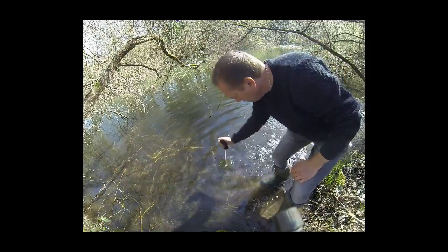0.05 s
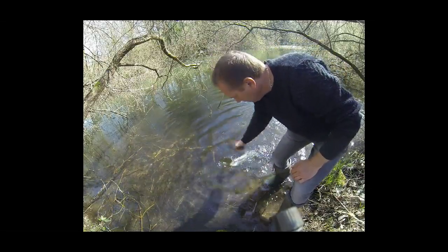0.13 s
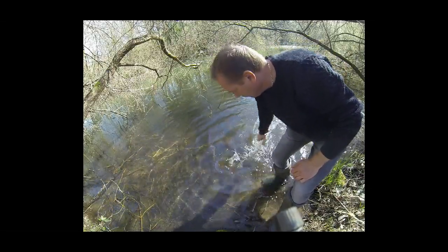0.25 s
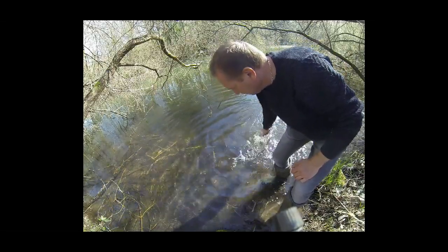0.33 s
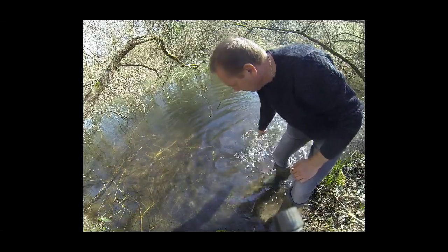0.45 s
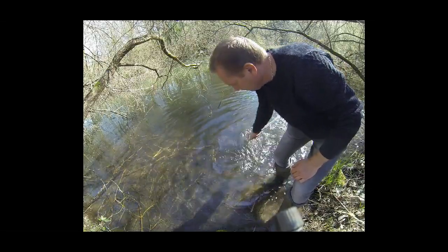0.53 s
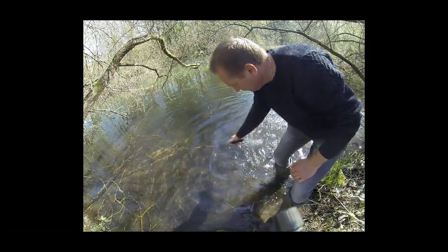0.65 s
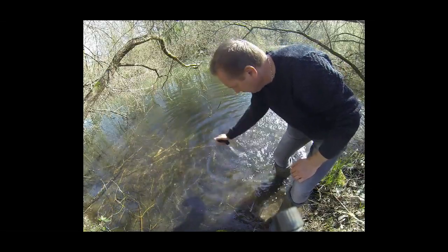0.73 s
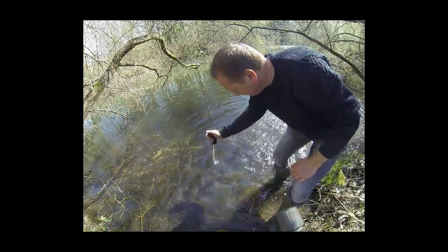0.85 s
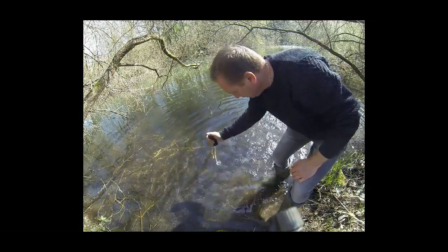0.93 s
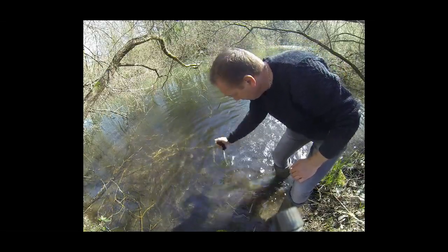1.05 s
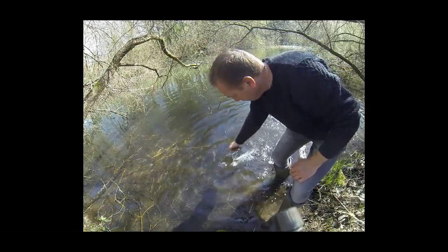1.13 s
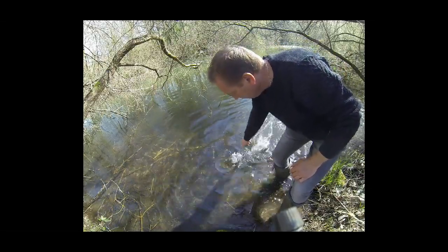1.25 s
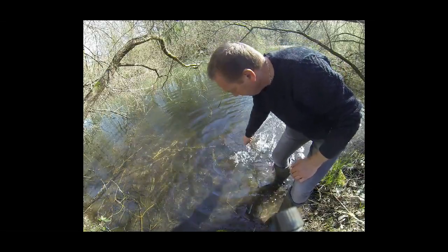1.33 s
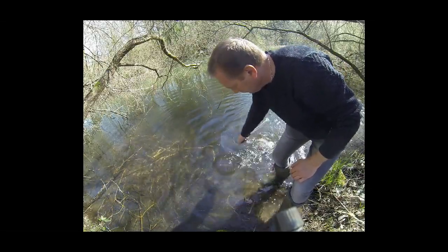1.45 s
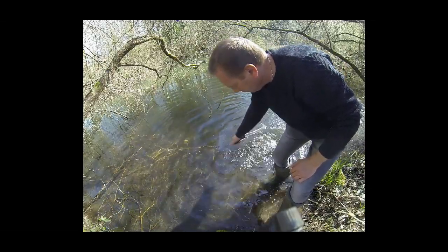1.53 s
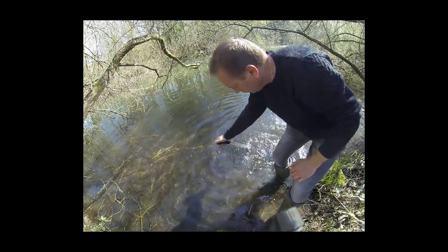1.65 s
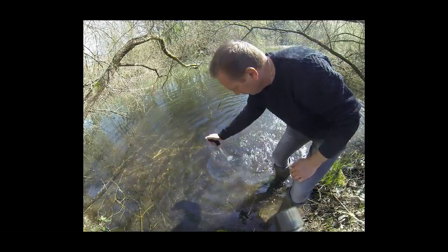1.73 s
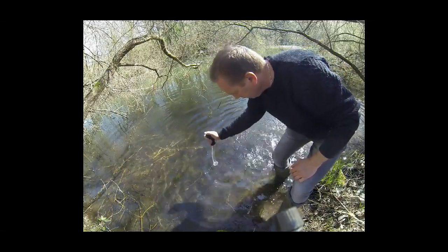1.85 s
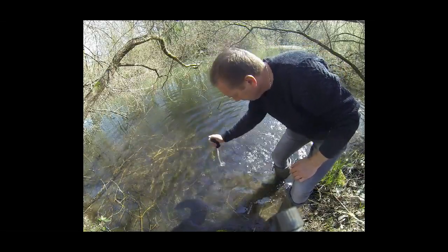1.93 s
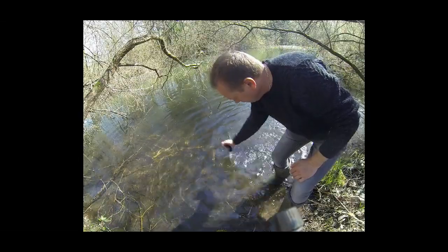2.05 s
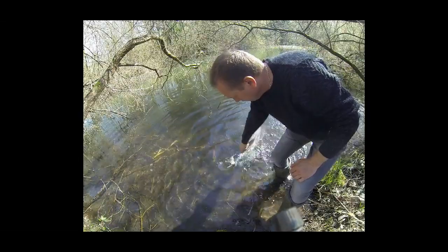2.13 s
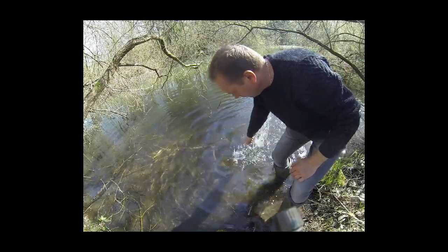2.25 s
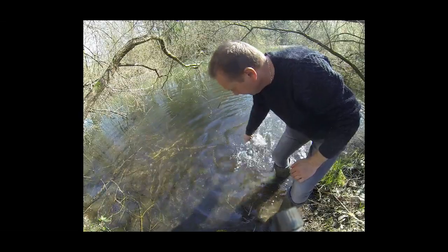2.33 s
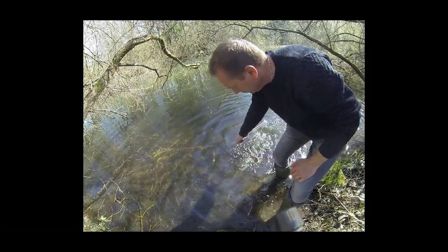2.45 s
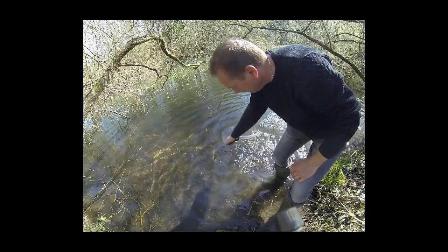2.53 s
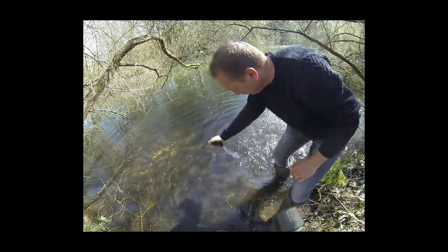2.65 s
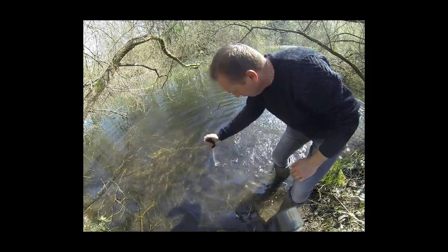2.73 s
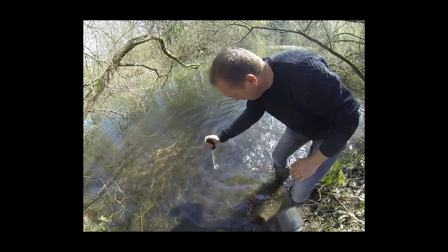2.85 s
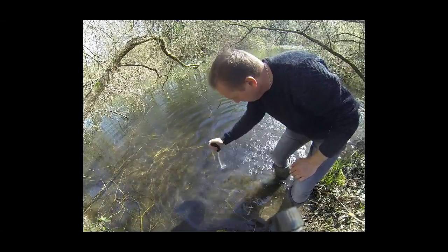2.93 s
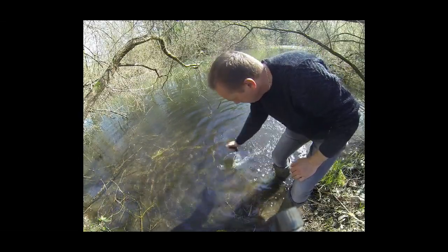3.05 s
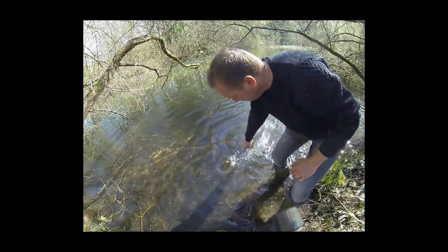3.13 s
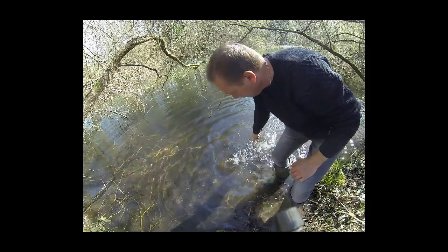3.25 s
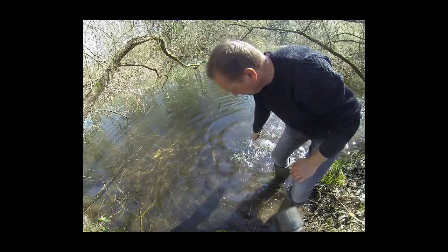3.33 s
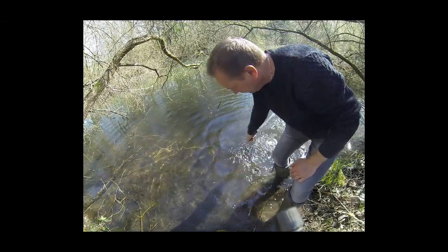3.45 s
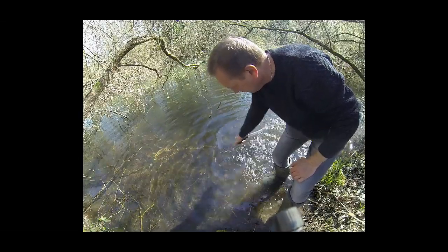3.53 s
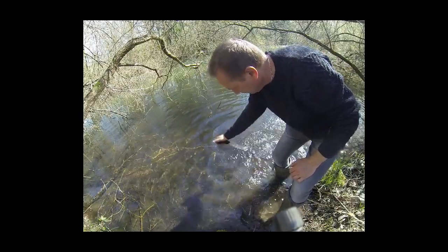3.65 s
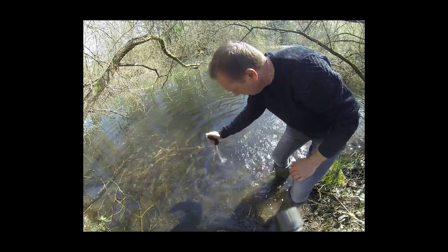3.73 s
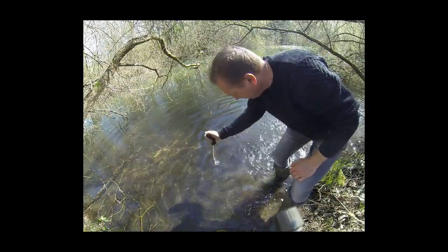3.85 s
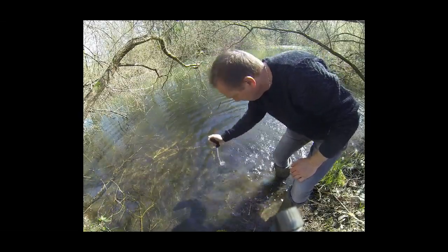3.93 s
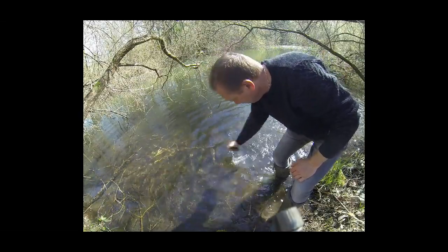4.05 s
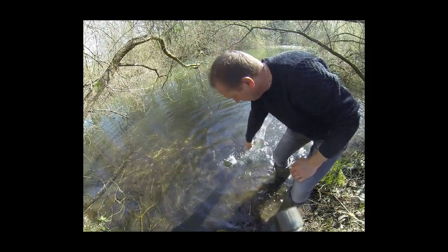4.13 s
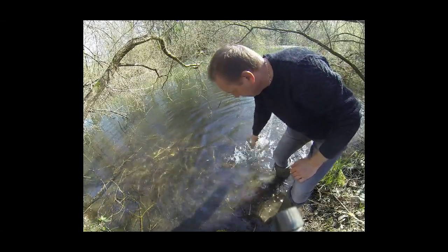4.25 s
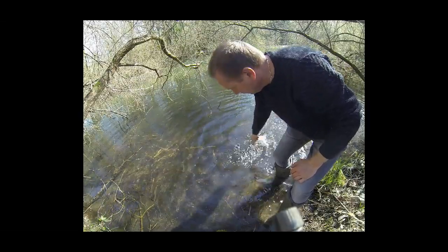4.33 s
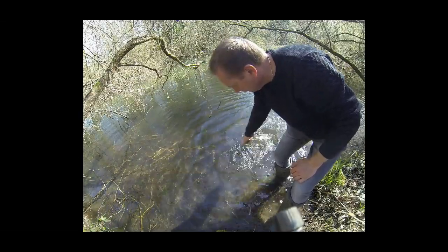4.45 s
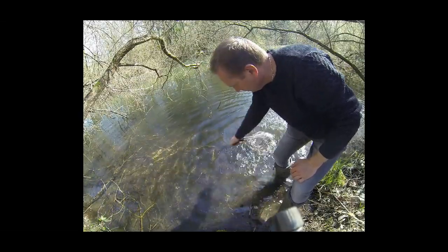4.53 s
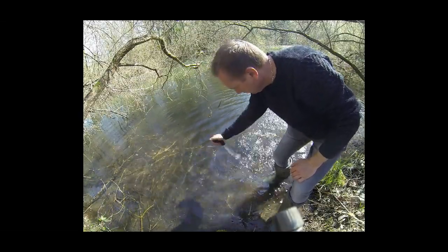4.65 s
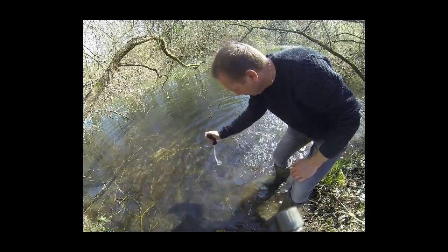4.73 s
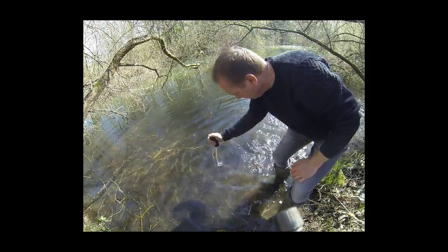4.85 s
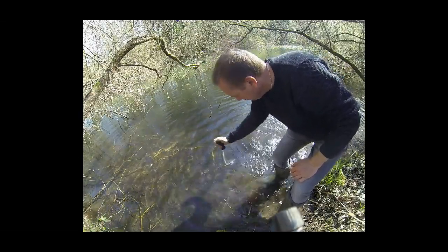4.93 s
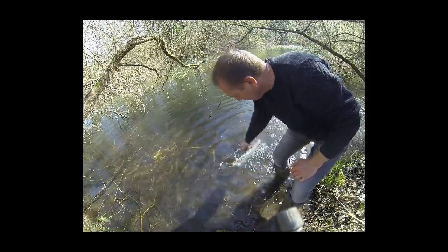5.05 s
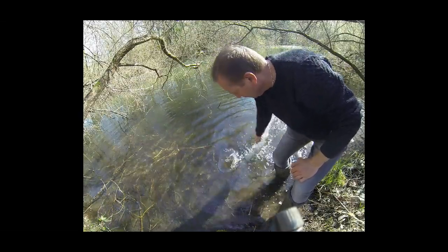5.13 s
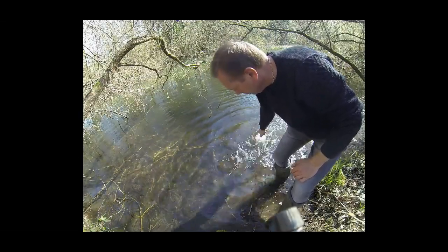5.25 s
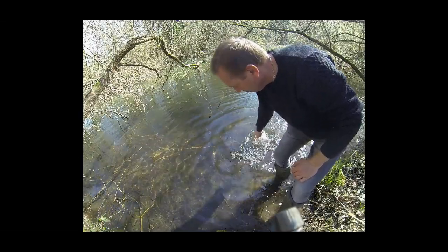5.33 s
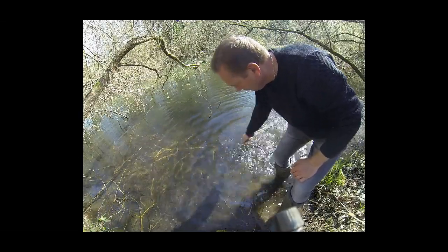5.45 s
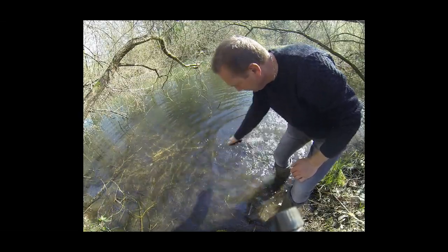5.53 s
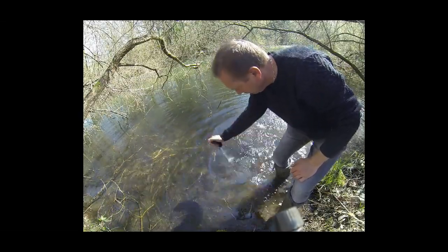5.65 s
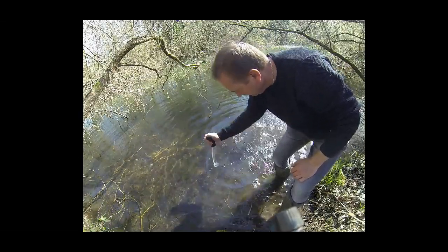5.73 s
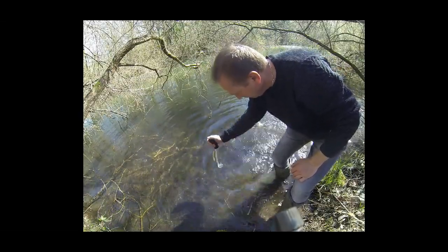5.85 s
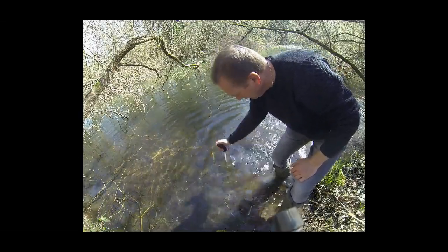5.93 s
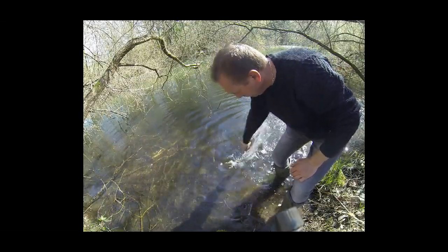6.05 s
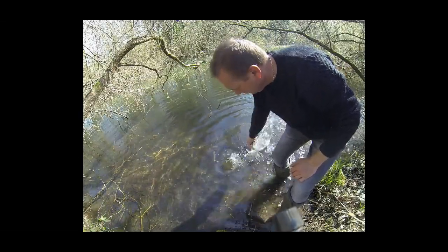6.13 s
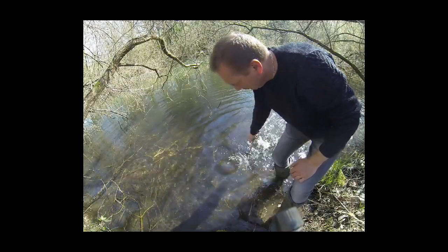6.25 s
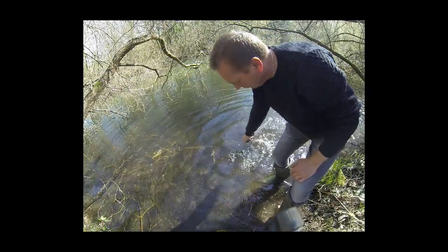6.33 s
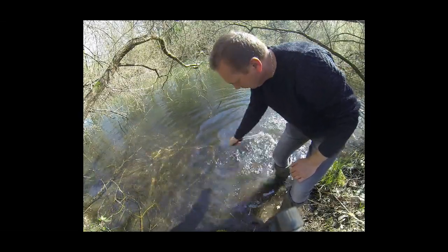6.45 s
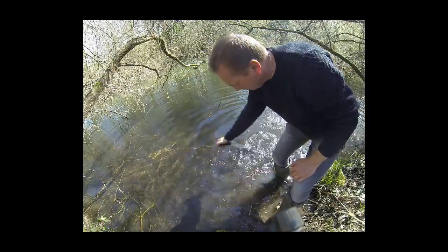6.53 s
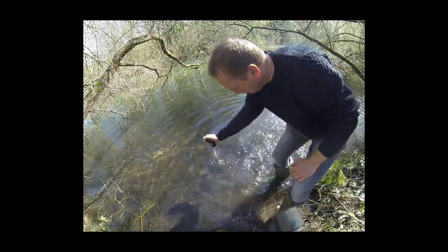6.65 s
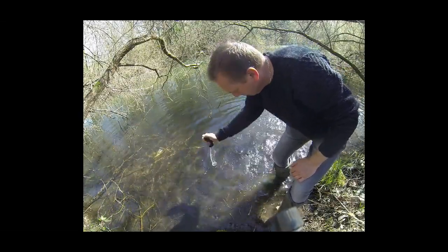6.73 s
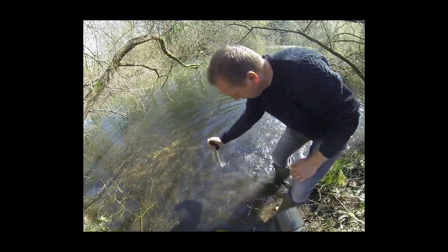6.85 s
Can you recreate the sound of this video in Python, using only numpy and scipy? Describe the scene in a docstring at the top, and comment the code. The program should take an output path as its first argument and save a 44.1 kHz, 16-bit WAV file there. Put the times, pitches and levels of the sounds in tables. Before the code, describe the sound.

Steady rhythm of seven deep water gulps at a tree-lined bank, close microphone. Each begins with a soft wet slap and low throb, pinches off and rises in a short round 'gloop', then water falls back with chirping bubbles, fine spray and a few bright drips. Between strokes it is quiet: a low airy hush, distant whistles and twitters, only a slight echo from the bank.

```python
"""A shallow bank with trees: a man drives a wooden catfish clonk into the water about once a second.
Each stroke is a gliding tone: an air cavity throbs, pinches off and rings as one big rising bubble.
Shaped noise makes the slaps and drips; dying sines make the small bubbles; swarms of both make the slosh.
Gliding sines and a band of noise make birds far off in the trees, over a soft outdoor hush."""
import sys
import numpy as np
from scipy import signal
from scipy.fft import rfft, irfft
from scipy.io import wavfile

SR = 44100
rng = np.random.default_rng(int(sys.argv[2]) if len(sys.argv) > 2 else 0)


def file_out(sig):
    """Save sig as 16-bit WAV at sys.argv[1]."""
    # one column per channel
    cols = np.atleast_2d(sig).T
    # limit, then scale
    lim = np.clip(cols, -1, 1)
    pcm = np.round(lim * 32767).astype(np.int16)
    wavfile.write(sys.argv[1], SR, pcm)


N = 303849
TIME = np.arange(N) / SR

# Levels in the tables are relative: the layers that use them may trim them further.
# Spectrum of the outdoor hush: pitch_hz [Hz], level_db [dB]
AIR_SPECTRUM = [(10, -6), (22, 2.5), (55, 0), (170, -13.5), (320, -18.5), (560, -20), (1000, -24.5),
                (2600, -32.5), (3600, -31), (4600, -32.5), (5500, -33), (9000, -44), (11000, -41),
                (12800, -54.5)]
AIR_DB = -50.5
# Level curve of a far bird's buzzing trill: start_s [s], level_db [dB]
TRILL_CURVE = [(.5, -65), (.65, -63.5), (1.0, -65.5), (1.15, -77)]
# Long whistles of distant birds: start_s [s], length_s [s], start_hz [Hz], end_hz [Hz], level_db [dB]
BIRD_WHISTLES = [(0.47, 0.28, 1854, 1893, -63.5), (0.81, 0.197, 2135, 2236, -59.5),
                 (1.44, 0.146, 2350, 2230, -67), (4.55, 0.23, 6000, 5460, -68)]
# One bird's swooping note: start_s [s], length_s [s], lowest_hz [Hz], level_db [dB],
# hook [rise at the end, share of the pitch]
BIRD_SWOOPS = [(3.65, .06, 3500, -59, 0.08), (5.34, 0.056, 4700, -57, 0.044),
               (5.39, 0.055, 3900, -54.5, 0.032), (5.701, .07, 4780, -59, 0.024),
               (5.82, .1, 3770, -58, .14), (6.10, .07, 4900, -57, 0), (6.487, .11, 3700, -59.5, 0.13),
               (6.83, .07, 4850, -56, 0.038)]
SWOOP_DROP, SWOOP_FALL_S = 0.42, 0.012  # extra pitch at the start as a share, and how fast it falls away
HOOK_AT_S, HOOK_RISE_S = 0.062, 0.01
# Runs of very high, thin calls: start_s [s], length_s [s], level_db [dB]
BIRD_TWITTERS = [(1.54, .2, -71), (4.488, .45, -74), (5.463, .4, -72)]
# Spectrum of the echo off bank and trees: pitch_hz [Hz], level_db [dB]
BANK_SPECTRUM = [(60, -24), (160, -12), (260, -2), (430, 0), (650, -6), (2000, -8), (12000, -15)]
# Spectra of coarse churn and fine spray: pitch_hz [Hz], level_db [dB]
CHURN_SPECTRUM = [(180, -7), (330, -19), (600, -2), (1100, 1.5), (2000, -1), (3000, -1.5), (4300, -7),
                  (5500, -20), (7000, -28)]
SPRAY_SPECTRUM = [(3000, 6), (5000, 2), (6200, 3.5), (7600, -5), (10000, -4), (12000, -12.5), (15000, -52)]
# Thrown water falls back about a fifth of a second after each stroke:
# start_s [s], length_s [s], level_db [dB]
WATER_FALLBACKS = [(0.243, .16, -50), (1.316, 0.059, -44.5), (2.299, 0.076, -45), (3.237, 0.055, -44),
                   (4.255, .12, -45.5), (5.215, 0.12, -43), (6.214, 0.11, -44.5)]
FALLBACK_RISE_S, FALLBACK_DECAY_S = 0.023, 0.065  # of the amplitude swell
SPLASH_DECAY_S = 0.012
# Drips off the lifted blade: start_s [s], level_db [dB], pitch_hz [Hz], width_hz [Hz]
BLADE_DRIPS = [(.335, -43.5, 5300, 3000), (0.549, -46.5, 4900, 2520), (1.307, -51, 6900, 3000),
               (1.785, -52, 6700, 450), (2.373, -45.5, 6360, 500), (2.648, -50, 5760, 600),
               (2.8414, -55, 7060, 450), (4.4816, -47, 6360, 800), (5.500, -50.5, 5500, 2530),
               (5.947, -37, 7460, 4070)]
DRIP_T60_S = 0.05
# A bright tick at the top of each swing: start_s [s], level_db [dB]
SWING_TICKS = [(.9756, -52), (1.933, -48.5), (2.900, -46.5), (3.9176, -45), (4.877, -44.5), (5.8538, -47),
               (6.828, -47.5)]
# The blade tip breaks the surface just before each stroke: start_s [s], level_db [dB], start_hz [Hz]
TIP_ENTRIES = [(.057, -36, 720), (1.060, -28.5, 614), (2.021, -29.5, 546), (2.996, -38.5, 740),
               (3.993, -29.5, 630), (4.958, -30.5, 690), (5.935, -27, 593)]
# The largest bubbles in the wake: start_s [s], start_hz [Hz], level_db [dB],
# rise [share of the pitch over the ring], pop [strength as a share of the ring]
WAKE_BUBBLES = [(0.2, 1045, -28.5, 0.6, .1), (0.286, 1610, -31.5, 0, 0.94), (.347, 1750, -37, .1, 0.27),
                (0.381, 1200, -35, 0.43, .1), (0.414, 1720, -37, 0.099, .1), (1.323, 2830, -28, 0.1, 0.44),
                (1.328, 1060, -39, 0.2, .1), (1.351, 867, -36, 0.061, 0.09), (1.424, 1160, -43, 0.2, .1),
                (2.07, 720, -25.5, 0.12, 0.091), (2.159, 980, -29, 1, 0.43),
                (2.358, 1046, -34.5, 0.67, 0.089), (3.051, 1090, -23.5, 0.029, .1),
                (3.122, 1080, -33, 0.036, .1), (3.275, 4030, -31.5, 0.81, .1), (3.295, 1480, -37, .1, 0.58),
                (3.346, 866, -32, 1, .2), (3.436, 1170, -42, .1, .1), (4.162, 1355, -30.5, 0.07, 0.69),
                (4.296, 1360, -31.5, 0.017, 0.17), (4.388, 1207, -33, 0, .1), (4.427, 2370, -36.5, .1, .1),
                (5.031, 1080, -32.5, 0.1, .1), (5.214, 602, -31.5, 0.063, 0.18),
                (5.24, 745, -31, 0.042, .1), (5.271, 2160, -28, 0.49, .1), (5.303, 1065, -31, 0.43, 0.55),
                (5.416, 990, -46, 0.12, .7), (6.191, 805, -33, 0.23, 0.94), (6.231, 824, -23.5, 0.48, 0.27),
                (6.289, 993, -32.5, 0.08, .1)]
RING_T60_S, RING_AT_HZ, RING_SLOPE = 0.051, 990, 0.72  # smaller bubbles ring higher and die sooner
# Spectrum of slaps, smacks and bubble pops: pitch_hz [Hz], level_db [dB]
SLAP_SPECTRUM = [(150, 6), (450, 0.5), (850, -1), (1300, -7), (2000, -6), (2800, -14), (4200, -13.5),
                 (6300, -27.5), (8500, -22), (11500, -35), (15000, -58)]
# The strokes: start_s [s], cavity_db [dB], settled cavity_hz [Hz], pinch_s [s after the start],
# bubble_db [dB], bubble start_hz [Hz], bubble life_s [s], slap_db [dB], smack_lead_s [s],
# smack_db [dB], splash_db at pinch-off [dB], churn_db [dB], churn_life_s [s]
CLONK_STROKES = [(0.0878, -7, 77.4, 0.032, -6, 250, 0.02, -21, 0.0027, -22, -38, -44, .11),
                 (1.0959, -6, 64.6, 0.0079, -5.5, 171, 0.042, -20, 0.0032, -23, -37, -48.5, 0.25),
                 (2.054, -5, 74, 0.014, -8.5, 164, 0.035, -20.5, .003, -14.5, -34.5, -47.5, 0.26),
                 (3.0290, -6.5, 80.4, 0.02, -6.5, 230, 0.025, -17.5, .003, -28, -36, -47, 0.15),
                 (4.0323, -8, 59, 0.0103, -6.5, 121.5, 0.0444, -19, 0.0027, -41, -32.5, -46.5, 0.23),
                 (4.9983, -5, 68.5, 0.013, -9, 146, 0.037, -17.5, 0.014, -21.5, -35.5, -48.5, 0.31),
                 (5.9722, -3.5, 80, 0.0056, -7, 135, 0.045, -19, 0.0021, -14, -57, -49, 0.37)]
STROKE_LEAD_S = 0.02  # sound rendered ahead of each plunge
EDGE_HZ = 15500


def amp(db):
    """Decibels to gain."""
    return 10 ** (np.asarray(db) / 20)


def unit(x):
    """Scales to an rms of one."""
    return x / np.sqrt(np.mean(x ** 2) + 1e-20)


def add(mix, start_s, sound):
    """Mixes a sound in at start_s, cut off at the end of the mix."""
    part = mix[max(round(start_s * SR), 0):][:len(sound)]
    part += sound[:len(part)]


def colour(x, points):
    """Gives x a spectrum of (Hz, dB) points, at an rms of one."""
    hz, db = np.transpose(points)
    f = np.fft.rfftfreq(len(x), 1 / SR)
    gain = amp(np.interp(np.log(f + 1), np.log(hz), db))
    return unit(irfft(rfft(x) * gain, len(x)))


def band(hz, width_hz, size=N):
    """Noise in a bell-shaped band; around zero it is a slow random drift."""
    f = np.fft.rfftfreq(size, 1 / SR)
    bell = np.exp(-0.5 * ((f - hz) / width_hz) ** 2)
    return unit(irfft(rfft(rng.standard_normal(size)) * bell, size))


def sine(hz):
    """A sine that follows the pitch curve hz."""
    return np.sin(2 * np.pi * np.cumsum(hz) / SR)


def air(gust_db=2, whine_hz=5080, whine_width_hz=65, whine_db=-73, octave_db=-87):
    """Outdoor hush with an uneven rumble, and a faint thin whine with its octave."""
    hush = amp(AIR_DB) * colour(rng.standard_normal(N), AIR_SPECTRUM)
    rumble = signal.sosfilt(signal.butter(2, 120, fs=SR, output="sos"), hush)
    unevenness = amp(gust_db * band(0, 1.3)) - 1
    whine = amp(whine_db) * band(whine_hz, whine_width_hz)
    octave = amp(octave_db) * band(2 * whine_hz, 2 * whine_width_hz)
    return hush + rumble * unevenness + whine + octave


def chatter(lo_hz=4600, hi_hz=8600, chatter_db=-80, fall=0.081, waver=0.023, count=200):
    """Many small birds farther off: short quavering, falling chips at random."""
    out = np.zeros(N)
    quaver = waver * band(0, 117)
    for when, pitch, span, loud in rng.random((count, 4)):
        u = np.linspace(0, 1, int((0.024 + 0.095 * span) * SR))
        wobble = quaver[int(when * (N - len(u))):][:len(u)]
        hz = (lo_hz + (hi_hz - lo_hz) * pitch) * (1 - fall * u + wobble)
        add(out, when * N / SR, amp(chatter_db + 5.7 * loud) * np.sin(np.pi * u) * sine(hz))
    return out


def note(hz, waver=0.0178):
    """A soft-edged bird note that wavers around the pitch curve hz."""
    hz = hz * (1 + waver * band(0, 42, size=SR)[:len(hz)])
    return np.sqrt(2) * signal.windows.tukey(len(hz), 0.6) * sine(hz)


def trill(hz=3500, width_hz=560):
    """A buzzing trill: a band of noise that follows a level curve, silent outside it."""
    level_db = np.interp(TIME, *np.transpose(TRILL_CURVE), left=-np.inf, right=-np.inf)
    return amp(level_db) * band(hz, width_hz)


def whistles():
    """Thin whistles that glide quickly at first, then settle on the end pitch."""
    out = np.zeros(N)
    for start_s, length_s, start_hz, end_hz, level_db in BIRD_WHISTLES:
        u = np.linspace(0, 1, int(length_s * SR))
        hz = end_hz + (start_hz - end_hz) * (1 - u) ** 2
        add(out, start_s, amp(level_db) * note(hz, waver=0.0113))
    return out


def swoops():
    """Notes that swoop down in pitch and may hook up again."""
    out = np.zeros(N)
    for start_s, length_s, lowest_hz, level_db, hook in BIRD_SWOOPS:
        t = np.arange(0, length_s, 1 / SR)
        hooked = 0.5 + 0.5 * np.tanh((t - HOOK_AT_S) / HOOK_RISE_S)
        hz = lowest_hz * (1 + SWOOP_DROP * np.exp(-t / SWOOP_FALL_S) + hook * hooked)
        add(out, start_s, amp(level_db) * note(hz))
    return out


def twitters(start_hz=8400, fall=0.11, call_s=0.07, gap_s=0.14, scatter=0.02):
    """Evenly spaced falling calls, each at a slightly different pitch."""
    out = np.zeros(N)
    slide = start_hz * np.linspace(1, 1 - fall, int(call_s * SR))
    for start_s, length_s, level_db in BIRD_TWITTERS:
        for when in np.arange(start_s, start_s + length_s, gap_s):
            add(out, when, amp(level_db) * note(slide * (1 + scatter * rng.standard_normal())))
    return out


def echo(x, t60_s, points, delay_s=0.011):
    """Scattered reflections from the bank and the trees: sparse random taps that swell, then die."""
    t = np.arange(SR) / SR
    sparse = rng.standard_normal(SR) * (rng.random(SR) < 0.05)
    taps = colour(sparse, points) * amp(-60 * t / t60_s) * (1 - np.exp(-(t / delay_s) ** 2))
    return signal.oaconvolve(x, taps / np.linalg.norm(taps))[:N]


def plip(hz, t60_s, glide, attack_s=0.0003):
    """A small bubble: a dying sine whose pitch slides by the share glide over its ring."""
    t = np.arange(int(t60_s * SR) + 2) / SR
    ring = sine(hz * (1 + glide * t / t60_s))
    return ring * amp(-60 * t / t60_s) * (1 - np.exp(-t / attack_s))


def droplets(lo_hz, hi_hz, per_s, spread_db, cycles, count=28):
    """A dense swarm of tiny bubbles, most weak and a few strong; all ring for as many cycles."""
    out = np.zeros(N)
    for hz in np.geomspace(lo_hz, hi_hz, count):
        strength = amp(spread_db * np.minimum(rng.exponential(1, N), 3.5))
        hits = (rng.random(N) < per_s / count / SR) * strength
        drop = hz * plip(hz, cycles / hz, 0.055, attack_s=1.06 / hz)
        out += signal.oaconvolve(hits, drop)[:N]
    return unit(out)


def agitation(splash_gain_db, churn_gain_db, fallback_gain_db):
    """How hard the water moves: splash at pinch-off, churn that holds and stops, water falling back."""
    power, t = np.zeros(N), np.arange(SR) / SR
    for start_s, _, _, pinch_s, *_, splash_db, churn_db, churn_life_s in CLONK_STROKES:
        splash = amp(splash_db + splash_gain_db) * np.exp(-t / SPLASH_DECAY_S)
        churn = amp(churn_db + churn_gain_db) * np.exp(-(t / churn_life_s) ** 4)
        add(power, start_s + pinch_s, splash ** 2 + churn ** 2)
    for start_s, length_s, level_db in WATER_FALLBACKS:
        before = np.minimum(TIME - start_s, 0) / FALLBACK_RISE_S
        after = np.maximum(TIME - start_s - length_s, 0) / FALLBACK_DECAY_S
        swell = np.exp(-before ** 2 - after)
        power += (amp(level_db + fallback_gain_db) * swell) ** 2
    return np.sqrt(power)


def slosh(wash=0.84, churn_wash=1.35, clump_db=2.34):
    """Water falls back into the hole and runs off the lifted blade: coarse churn and fine spray."""
    coarse = agitation(splash_gain_db=0, churn_gain_db=-1.0, fallback_gain_db=-2.5)
    fine = agitation(splash_gain_db=-14, churn_gain_db=-10.0, fallback_gain_db=-8.5)
    big_drops = droplets(299.5, 6040, per_s=1300, spread_db=5.4, cycles=41.0)
    churn = colour(big_drops + churn_wash * rng.standard_normal(N), CHURN_SPECTRUM)
    small_drops = droplets(3690, 16300, per_s=1200, spread_db=1.8, cycles=54)
    spray = colour(small_drops + wash * rng.standard_normal(N), SPRAY_SPECTRUM)
    clumps = unit(amp(clump_db * band(0, 54)))  # the drops land in clusters
    return clumps * (coarse * churn + fine * spray)


def drips(trim_db=-1, tick_hz=7300, tick_width_hz=3400, tick_t60_s=0.022):
    """Drops land with a bright splat of noise; each swing turns with a shorter tick."""
    out, t = np.zeros(N), np.arange(SR // 12) / SR
    for start_s, level_db, hz, width_hz in BLADE_DRIPS:
        level = amp(level_db + trim_db - 60 * t / DRIP_T60_S)
        add(out, start_s, level * np.tanh(t * hz) * band(hz, width_hz, size=len(t)))
    for start_s, level_db in SWING_TICKS:
        level = amp(level_db + trim_db - 60 * t / tick_t60_s)
        add(out, start_s, level * np.tanh(t * tick_hz) * band(tick_hz, tick_width_hz, size=len(t)))
    return out


def wake_bubble(hz, rise, pop, pop_decay_s=0.001):
    """A bubble breaks loose with a pop and rings for a time set by its size."""
    t = np.arange(SR // 8) / SR
    out = pop * np.exp(-t / pop_decay_s) * colour(rng.standard_normal(len(t)), SLAP_SPECTRUM)
    add(out, 0, plip(hz, RING_T60_S * (RING_AT_HZ / hz) ** RING_SLOPE, rise))
    return out


def stray_bubbles(lo_hz=660, hi_hz=1500, stray_db=-37, fade_db=-6, linger_s=0.062, max_rise=0.66,
                  pop=0.13, count=4):
    """Each fall of water traps a few weaker bubbles, the late ones faintest."""
    out = np.zeros(N)
    for start_s, length_s, _ in WATER_FALLBACKS:
        for late, pitch, rise in rng.random((count, 3)):
            bubble = wake_bubble(lo_hz * (hi_hz / lo_hz) ** pitch, max_rise * rise, pop)
            add(out, start_s + late * (length_s + linger_s), amp(stray_db + fade_db * late) * bubble)
    return out


def bubbles(entry_glide=-0.87, entry_t60_s=0.035, tick_db=-18):
    """The tip enters with a tick and a falling plip; most bubbles in the wake chirp upward."""
    out, t = np.zeros(N), np.arange(SR // 20) / SR
    for start_s, level_db, hz in TIP_ENTRIES:
        add(out, start_s, amp(level_db) * plip(hz, entry_t60_s, entry_glide, attack_s=0.0011))
        tick = np.exp(-t / 0.018) * band(1400, 5600, size=len(t))
        add(out, start_s, amp(level_db + tick_db) * tick)
    for start_s, hz, level_db, rise, pop in WAKE_BUBBLES:
        add(out, start_s, amp(level_db) * wake_bubble(hz, rise, pop))
    return out


def slaps(rise_s=0.0057, fall_s=0.005, gurgle=0.087, gurgle_decay_s=0.073, smack_decay_s=0.0029,
          pinch_db=12):
    """The head tears the surface in a gritty burst; water smacks as the cavity opens and seals."""
    out, t = np.zeros(N), np.arange(SR // 8) / SR
    smack = np.minimum(t / 0.0004, 1) * np.exp(-t / smack_decay_s)
    before, after = np.minimum(t - STROKE_LEAD_S, 0), np.maximum(t - STROKE_LEAD_S, 0)
    tail = np.exp(-after / fall_s) + gurgle * np.exp(-after / gurgle_decay_s)
    burst = np.exp(-(before / rise_s) ** 2) * tail
    for start_s, _, _, pinch_s, *_, slap_db, smack_lead_s, smack_db, splash_db, _, _ in CLONK_STROKES:
        hits = [(start_s - STROKE_LEAD_S, slap_db, burst),
                (start_s - smack_lead_s, smack_db, smack),
                (start_s + pinch_s, splash_db + pinch_db, smack)]
        for when, level_db, shape in hits:
            grit = colour(rng.standard_normal(len(t)), SLAP_SPECTRUM)
            add(out, when, amp(level_db) * shape * grit)
    return out


def clonk(cavity_db, cavity_hz, pinch_s, bubble_db, start_hz, life_s, top_hz=430, bend=1.49,
          opening_s=0.003, cavity_decay_s=0.016, fade=1.31):
    """The open cavity throbs; once sealed it is a bubble that climbs in pitch and dies at the surface."""
    t = np.arange(SR // 6) / SR - STROKE_LEAD_S
    age = np.maximum(t - pinch_s, 0) / life_s
    sealed = 0.5 + 0.5 * np.tanh((t - pinch_s) / 0.0008)
    # the climb levels off near the surface
    bubble_hz = top_hz - (top_hz - start_hz) * np.maximum(1 - age, 1e-6) ** bend
    # the young cavity is small and throbs faster
    open_hz = cavity_hz * (1 + 0.25 / (1 + np.exp(t / 0.0009)))
    turns = np.cumsum(open_hz + sealed * (bubble_hz - open_hz)) / SR
    turns -= np.interp(0, t, turns)  # the pressure peaks as the head plunges
    swell = np.exp(-(t / opening_s) ** 2 / 2)
    decay = 0.3 + 0.69 * np.exp(-abs(t) / cavity_decay_s)
    cavity = amp(cavity_db) * np.where(t < 0, swell, decay)
    bubble = amp(bubble_db) * np.exp(-fade * age) / (1 + (age / 0.86) ** 8)
    snap = 1 + 0.39 * np.exp(-((t - pinch_s) / 0.003) ** 2)  # the closing neck squeezes the air
    return snap * (cavity + sealed * (bubble - cavity)) * np.cos(2 * np.pi * turns)


def clonks(notch_hz=287, notch_q=7.7, depth=0.63):
    """All strokes, with a narrow hollow in the response that each rising tone passes through."""
    out = np.zeros(N)
    for start_s, *settings in CLONK_STROKES:
        add(out, start_s - STROKE_LEAD_S, clonk(*settings[:6]))
    hollow = signal.lfilter(*signal.iirnotch(notch_hz, notch_q, SR), out)
    return out + depth * (hollow - out)


def scene(bank_db=-28.5, bank_t60_s=0.6, wake_echo_db=-14, bird_dry_db=-2, bird_echo_db=-7):
    """The near water is almost dry; the birds come partly through the trees."""
    strokes = clonks() + slaps()
    wake = bubbles() + stray_bubbles() + drips() + slosh()
    song = trill() + whistles() + swoops() + twitters() + chatter()
    stroke_echo = amp(bank_db) * echo(strokes, bank_t60_s, BANK_SPECTRUM)
    wake_echo = amp(wake_echo_db) * echo(wake, 0.094, BANK_SPECTRUM)
    water = strokes + wake + stroke_echo + wake_echo
    far = amp(bird_dry_db) * song + amp(bird_echo_db) * echo(song, 0.44, BANK_SPECTRUM)
    return (water + far + air())[None]


def record(dry, low_cut_hz=18):
    """The microphone sheds the lowest bass; then a steep low-pass sets the recorder's band limit."""
    thinned = signal.sosfilt(signal.butter(1, low_cut_hz, "high", fs=SR, output="sos"), dry)
    low_pass = signal.firwin(511, EDGE_HZ, window=("kaiser", 9), fs=SR)
    return signal.oaconvolve(thinned, low_pass[None], "same")


dry = scene()
out = record(dry)
file_out(out)
```